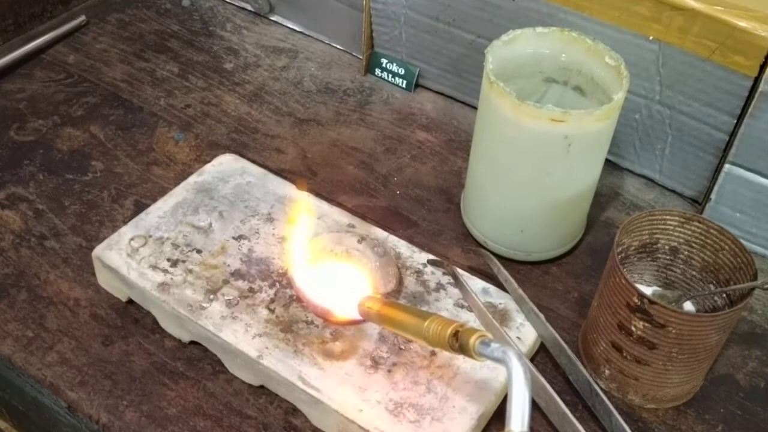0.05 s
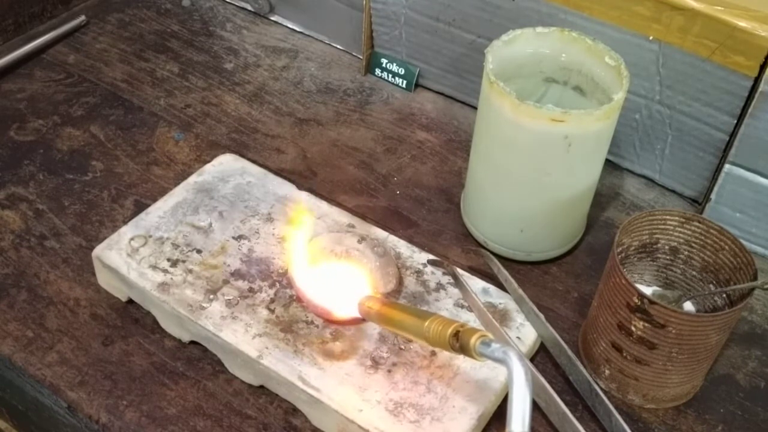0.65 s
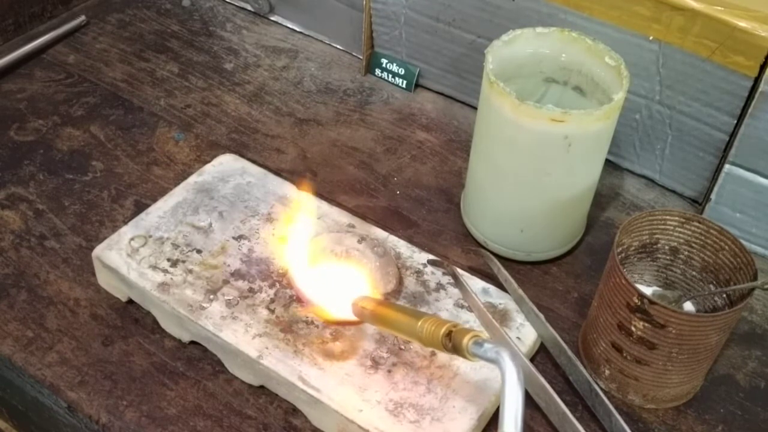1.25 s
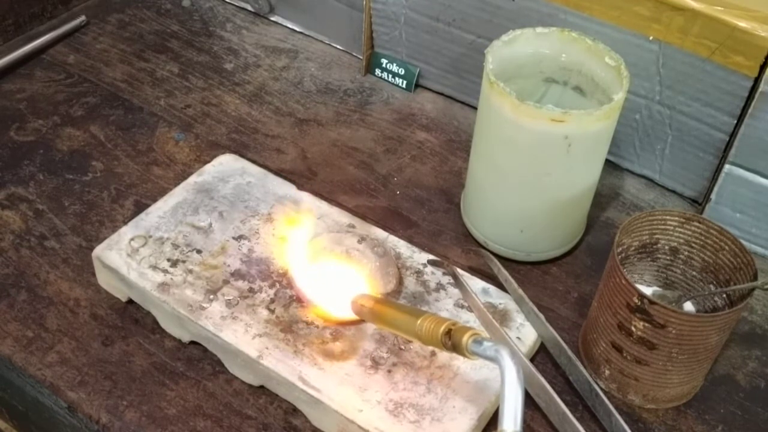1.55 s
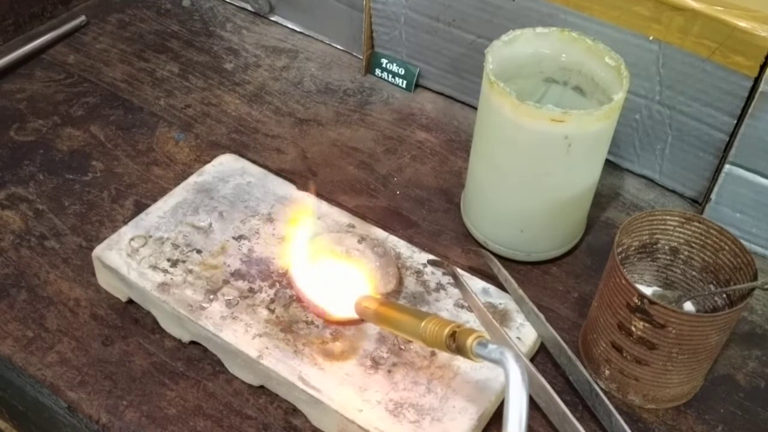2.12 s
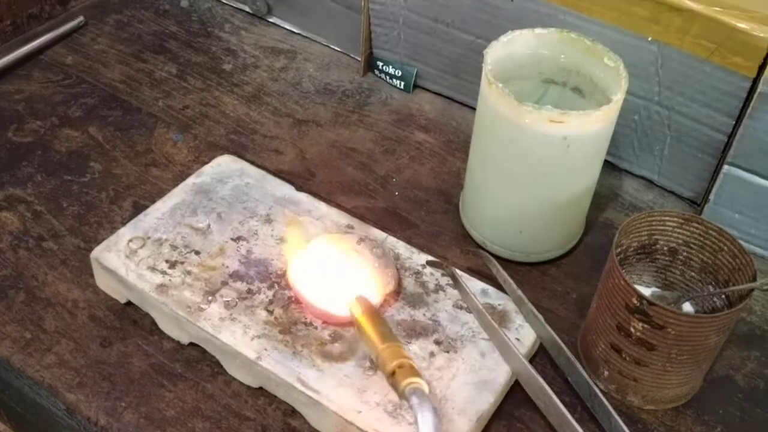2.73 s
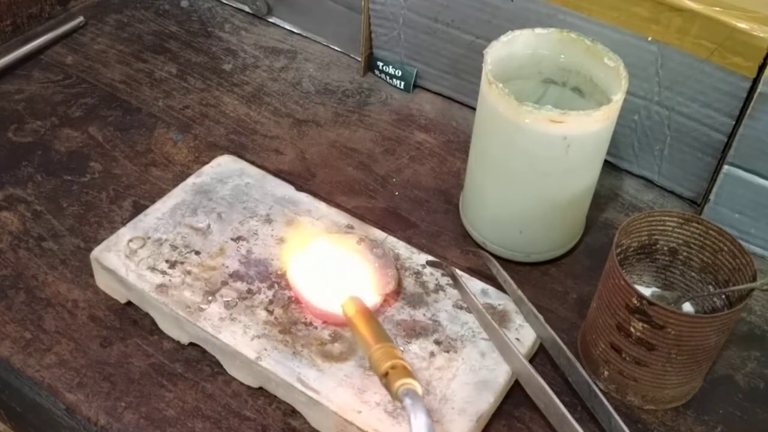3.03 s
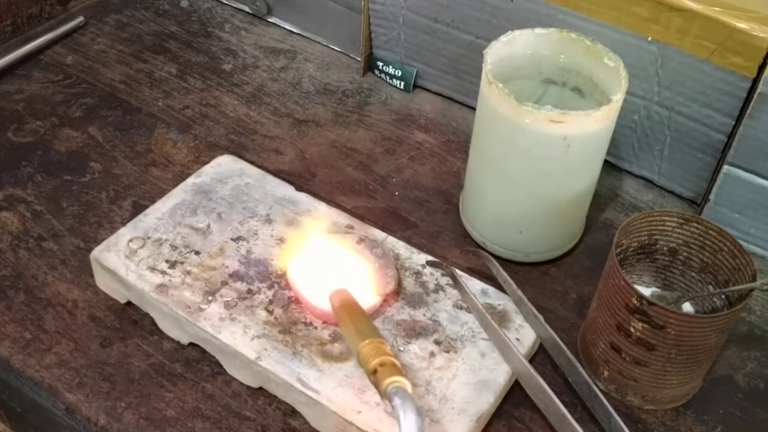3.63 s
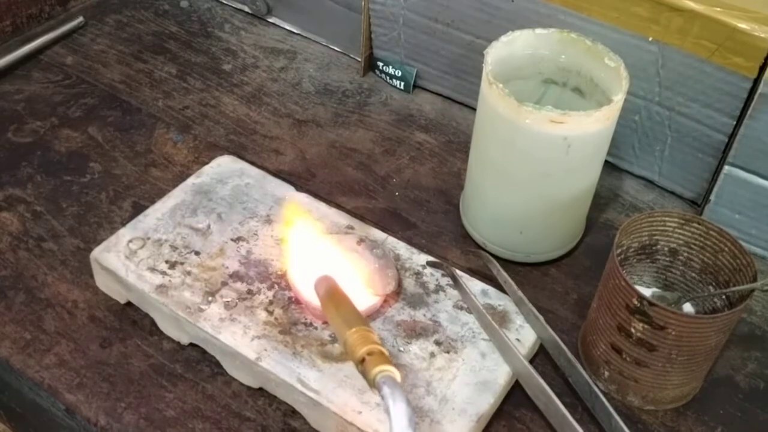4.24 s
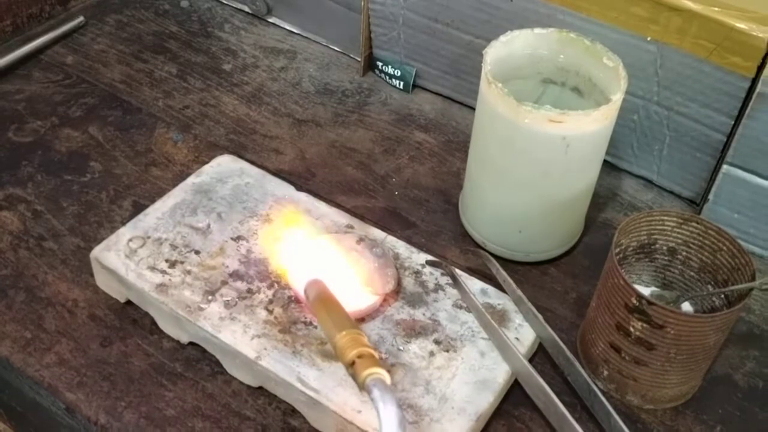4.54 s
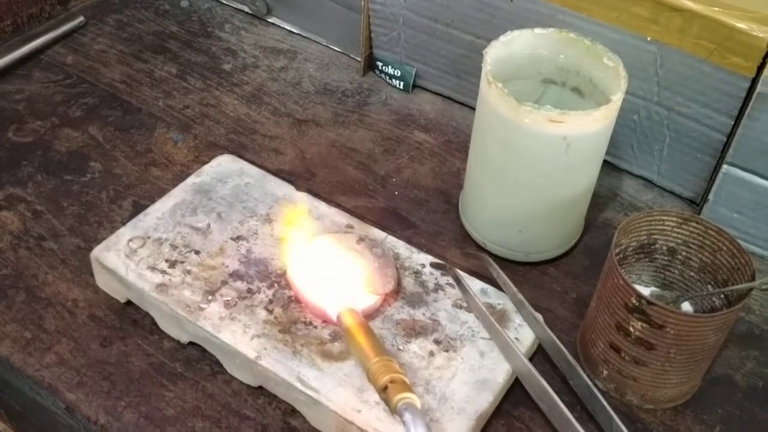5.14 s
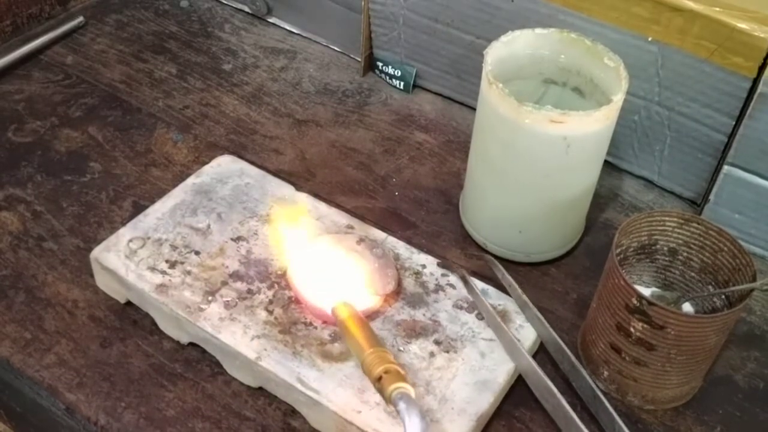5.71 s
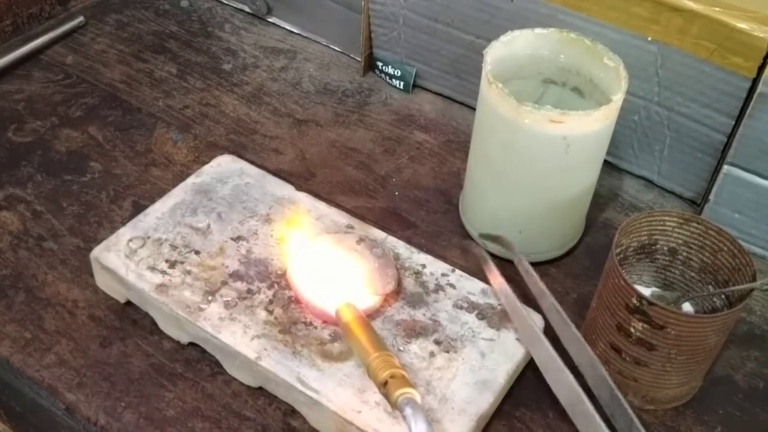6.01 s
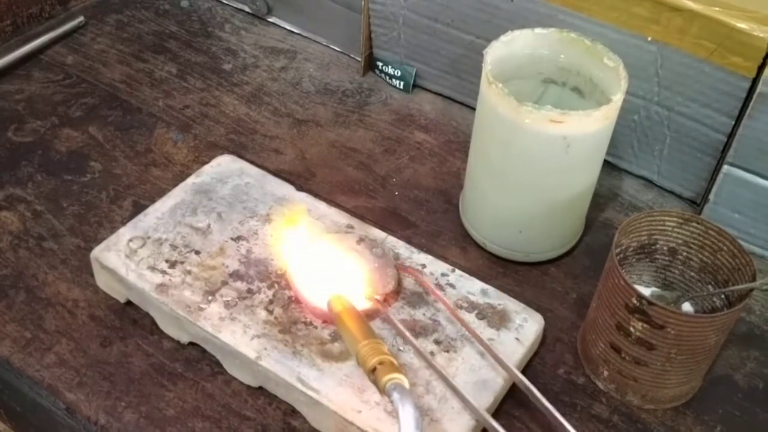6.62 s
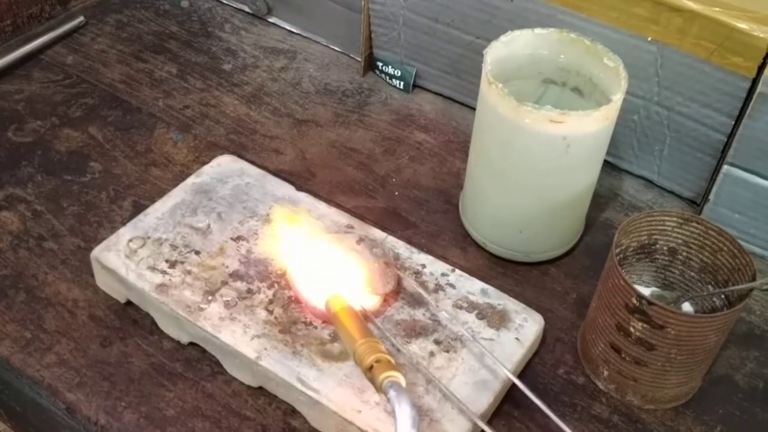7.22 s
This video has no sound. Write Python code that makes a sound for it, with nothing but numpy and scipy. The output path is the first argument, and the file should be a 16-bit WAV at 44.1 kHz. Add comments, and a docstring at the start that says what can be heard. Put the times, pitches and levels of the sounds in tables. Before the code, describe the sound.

A small gas torch burns into a crucible from start to finish, about seven seconds, heard close up on a workshop bench with only slight room reflection. The sound is a rough, steady roar with a softly fluttering bass and a bright gas hiss on top. Around 2.6 seconds the flame flares slightly and the torch swings round, shifting the colour of the hiss. From 3 seconds the nozzle pushes deeper into the bowl: hollow resonances swell and sink a little in pitch, strongest just after 4 seconds. From about 4.5 seconds it draws back, and the resonances ease and rise again while the roar carries on. Faint, very short sputters of catching gas are tucked into the flame at about 1.3, 1.5, 4.1 and 5.1 seconds, twice near 6 seconds, and at 6.8 seconds.

```python
"""A rough, steady roar with a bright hiss on top: a small gas torch plays into a crucible on a
firebrick, close by on a workshop bench. Turbulent eddies make the roar, the loose plume flutters in
the bass, the gas jet hisses at the nozzle, and now and then a pocket of gas catches with a sputter.
The torch is swung round and pushed deeper into the bowl, where most resonances swell and sink in
pitch; then it is drawn back."""
import sys
import numpy as np
from scipy import signal
from scipy.fft import rfft, irfft
from scipy.io import wavfile

SR = 44100
rng = np.random.default_rng(int(sys.argv[2]) if len(sys.argv) > 2 else 0)


def wav_record(signal):
    """Record a signal, one row per channel, as 16-bit PCM in the file named by sys.argv[1]."""
    frames = np.transpose(np.atleast_2d(signal))
    bounded = np.clip(frames, -1, 1)
    # unit amplitude maps onto the largest positive 16-bit level
    quanta = np.round(bounded * 32767).astype(np.int16)
    wavfile.write(sys.argv[1], SR, quanta)


N = 325017
TIME, FREQS = np.arange(N) / SR, np.arange(N // 2 + 1) * SR / N   # s, Hz


def from_db(db):
    """Decibels to gain."""
    return 10 ** (np.asarray(db) / 20)


def at_time(curve, s):
    """The value of an automation curve at the times s."""
    return np.interp(s, *np.transpose(curve))


def over_freqs(rows):
    """The columns of a spectrum table, joined on a log-frequency axis."""
    points, *columns = np.transpose(rows)
    return [np.interp(np.log(FREQS + 1e-9), np.log(points), c) for c in columns]


def bell(x, centre, half_width):
    """A bell curve of height 1, in time or frequency."""
    return np.exp(-np.minimum(((x - centre) / half_width) ** 2, 20))


def drift(corner_hz):
    """A random modulator with spread 1, rolling off above corner_hz."""
    slow = irfft(rfft(rng.standard_normal(N)) / (1 + (FREQS / corner_hz) ** 2), N)
    return slow / slow.std()


def colour(white, spectrum):
    """Shapes unit white noise to a spectrum in dB per Hz."""
    level_db, = over_freqs(spectrum)
    return irfft(rfft(white) * from_db(level_db), N) * np.sqrt(SR / 2)


# colouring by bench and wall: (centre [Hz], half width [Hz], left [dB], right [dB], phase twist [rad])
REFLECTION_EQ = [(107.4, 17, 2.7, 2, 0.04), (130, 8.6, -6.5, -6.9, -0.0), (162, 8.3, 2.5, 2.2, -0.0),
                 (184, 11.6, -5.3, -4, -1), (262.5, 44, 2, 3.5, -0.0), (309, 15, -1.7, -0.5, 0.2),
                 (360.8, 47, 7.5, 7, 0.27), (402, 13.5, -5, -7.1, -0.1), (444, 38, 4.0, -0.7, 0.06),
                 (470.4, 8, -5.0, -5, -0.3), (499, 12, 2.0, 3.5, -0.5), (543.4, 26.6, -8.5, -7, 0.7),
                 (612, 56, 0.3, -4, 0.3), (691, 48.5, -18.5, -11.5, -0.8), (728.7, 33, 9.3, 5.5, 0.65),
                 (970, 18, 3.5, 2.0, -0.3), (1040, 55, -0.2, 4.5, 0.1), (1110, 44.6, -7.0, -13, 3),
                 (1142, 15.4, 2, 3.6, -4.5), (1186, 22, 2, 2.5, -0.5), (1267, 34, -10, 4, -0.8),
                 (1287, 48, 1.4, -4.5, 1.5), (1448, 35, -12, 1.5, -2), (1478, 30, 0.5, -1.0, 2),
                 (1510, 15, -0.5, -5.8, 0.2), (1620, 89, 4.5, 4.5, 0.43), (1685, 48, -9, -4.7, 1),
                 (1820, 68, 0.3, -1, 1.1), (1885, 56, 5.5, -1.5, -1.3), (1950, 113, -3.5, 5.5, 0.46),
                 (2186, 43, 1.2, -4.5, -0.5), (2190, 20, 0, 1, 0.9), (2380, 44, 3, 7, 0.5),
                 (2458, 40, 0.5, 3.5, 2), (2519, 35, 1, -6, -1.2), (2640, 53, -2.5, 1.7, 0),
                 (2808, 29, -1.6, 4.5, 1.5), (2930, 106, 1.1, -0.7, 0.6), (3120, 47, 4.5, 1, 0.1),
                 (3350, 89, 1, 3.5, 0.1), (3984, 281, 2, 6, 0.0), (4320, 134, -1.2, 3, 3),
                 (4920, 380, 4.5, 0, 0.38), (6660, 86, -12, -3.4, 1)]


def reflections(stereo):
    """Bounces off bench and wall put peaks and dips into each side and twist the phase between them."""
    bands = (np.outer(heights, bell(FREQS, centre, width)) for centre, width, *heights in REFLECTION_EQ)
    left_db, right_db, twist = sum(bands)
    pan_db = 0.42
    gain = from_db([left_db - pan_db, right_db + pan_db])
    return irfft(rfft(stereo) * gain * np.exp(0.5j * twist * [[1], [-1]]), N)


# stereo image at the two mic ports: (frequency [Hz], likeness [0-1], phase of left against right [rad])
STEREO_IMAGE = [(100, .99, -.06), (330, .998, -.14), (600, .8, -.7), (760, .97, -.5), (1000, .98, -.44),
                (1350, .85, -2.1), (1750, .6, -.65), (2050, .25, -2), (2340, .82, -2.3), (2750, .3, -2.1),
                (3120, .62, -2.1), (3400, .35, -2.8), (4300, .17, -2.94), (5100, .66, -2.9),
                (6100, .72, -3.4), (7000, .42, -3.5), (7900, .6, -3.2), (9400, .1, -4.4),
                (11400, .26, -5.85), (13500, .28, -7.23)]


def mic_ports(core, fringes, room_t60_s=0.3, room_share=0.3):
    """The right port hears the core first; each port gets its own room tail and fringe of the flame."""
    likeness, phase = over_freqs(STEREO_IMAGE)
    direct = rfft(core) * np.exp(0.5j * phase * [[1], [-1]])
    tail = rng.standard_normal((2, N)) * from_db(-60 * np.minimum(TIME / room_t60_s, 2))
    tail /= np.linalg.norm(tail, axis=1, keepdims=True)
    diffuse = np.sqrt(room_share) * direct * rfft(tail) + np.sqrt(1 - room_share) * rfft(fringes)
    return irfft(np.sqrt(likeness) * direct + np.sqrt(1 - likeness) * diffuse, N)


# the hiss as heard, with a hollow near 8.3 kHz: (frequency [Hz], relative level [dB])
HISS_SPECTRUM = [(2000.0, -103), (5000.0, -87.5), (6100.0, -81), (6700.0, -80), (7600.0, -92.5),
                 (8300.0, -103.7), (9600.0, -84.5), (11000.0, -90), (11850.0, -86), (12600.0, -87),
                 (13800.0, -86), (15500.0, -96)]
# loudness of the hiss, rising as the torch leans in and falling as the bowl muffles it: (time [s], gain [dB])
HISS_LEVEL = [(0.25, -0.4), (1.29, -1), (2.15, -0.5), (2.6, 0.6), (2.81, -2), (3.15, -2.5), (3.55, -0.5),
              (3.7, -2), (4.35, -1), (4.71, -2.5), (4.96, -1.9), (5.89, -1.2), (7.3, -1.6)]


def gas_jet():
    """Gas leaves the nozzle with a bright, slightly flickering hiss; rows: the core and two fringes."""
    flicker_db = 0.33 * drift(corner_hz=22)
    flow = from_db(2.5 + at_time(HISS_LEVEL, TIME) + flicker_db)
    return flow * colour(rng.standard_normal((3, N)), HISS_SPECTRUM)


# the flame's sharpest sputters: (time [s], relative level [dB])
SPUTTER_HITS = [(1.330, -17), (1.493, -16.5), (4.070, -15), (5.075, -13), (5.9025, -10.5), (5.993, -14),
                (6.815, -13)]


def sputters(ring_hz=950, t60_s=0.011, gain_db=2.5):
    """A pocket of gas catches at once and rings in the bowl for a few cycles."""
    kicks = np.zeros(N)
    for s, level_db in SPUTTER_HITS:
        kicks[round(s * SR)] = from_db(level_db + gain_db)
    decay = from_db(-60 / (t60_s * SR))
    angle = 2 * np.pi * ring_hz / SR
    return signal.lfilter([0, np.sin(angle)], [1, -2 * decay * np.cos(angle), decay ** 2], kicks + 1e-18)


# the torch swings round the crucible: (time [s], turn [0-1])
TORCH_TURN = [(2.6, 0), (2.85, 0.86)]
# the nozzle is pushed into the bowl and drawn back: (time [s], depth [0-1])
NOZZLE_DEPTH = [(0.0, 0.1), (2.0, 0.01), (2.7, 0.25), (2.99, 0.36), (3.22, 0.63), (3.57, 0.53), (3.76, 0.7),
                (4.1, 0.99), (4.41, 0.88), (4.6, 0.66), (4.9, 0.38), (6.0, 0.25), (7.3, 0.07)]
# peaks and dips that follow the torch. The 8570 Hz row fills the hollow in the hiss as the torch turns
# and goes deeper; the others are the bowl's: (centre [Hz], half width [Hz], gain at rest [dB],
# added at full depth [dB], added at full turn [dB], pitch bend at full depth [share of centre])
MOVING_EQ = [(656, 35, 2, 8, -4.5, -0.053), (908, 203, 0.48, 6, 1.44, -0.12), (1384, 55, 4, 5, -4, -0.013),
             (2020, 160, 0.2, -11, 1, -0.11), (2300, 91, 2.5, 5, 0, -0.063),
             (2626, 81, 2, -6.5, -0.7, -0.091), (2940, 81, 2, 4.7, -0.5, -0.016),
             (3150, 63, -3.5, -8, 10.5, 0.047), (3545, 400, 5, 6, -5, -0.028),
             (3771, 88, -4, 2, 1.8, -0.027), (4356, 108, 6, -3, 4, -0.08), (4730, 240, 2.6, -6, -2, -0.056),
             (4880, 147, -0.7, 0.5, 1.5, 0.001), (5310, 840, 2.5, 4, 1.3, -0.13),
             (6230, 300, 0.5, 5, 0.2, 0.049), (6700, 370, -3.5, -5.5, 0.3, -0.05),
             (8570, 818, -2.5, 5.5, 6, -0.0081), (9770, 341, -1.6, -1.7, -0.7, -0.018),
             (11722, 740, 6, 0.2, -1.9, -0.058), (13122, 460, 0.5, -4.5, 3.0, 0.024),
             (15116, 672, 3, -5, -0.4, -0.007)]
# brief lifts and dips in single bands of the roar and hiss:
# (peak time [s], half length [s], centre [Hz], half width [Hz], gain [dB])
BAND_SWELLS = [(2.54, .24, 12800, 786, 2.6), (2.62, .16, 1748, 74, -10), (2.64, .07, 2250, 205, 4.5),
               (2.73, 0.2, 4370, 165, 4), (2.89, 0.15, 4170, 99, -8), (3.07, .22, 1575, 38, -3),
               (3.1, .25, 1250, 101, 5.5), (3.15, .13, 13778, 382, 6.6), (3.2, .3, 1980, 65, -7),
               (3.28, 0.5, 11210, 1036, 4), (3.32, .33, 2960, 226, -4.5), (3.348, .34, 839, 94, -3.5),
               (3.36, .19, 14848, 582, 7), (3.36, .4, 3870, 170, 5.5), (3.85, 0.23, 1770, 80, -4),
               (4.0, 0.14, 4050, 170, 2), (4.1, 0.19, 810, 80, 1.5), (4.238, .09, 2750, 133, 8),
               (4.72, .17, 11394, 711, 3), (5.15, 0.39, 400, 110, 2.5)]


def crucible(source):
    """The nozzle closes the bowl's mouth: most resonances grow and go flat; swirling gas wavers them."""
    hz, s, frames = signal.stft(source, SR, nperseg=1024)
    hz = hz[:, None]
    depth, turn = at_time(NOZZLE_DEPTH, s), at_time(TORCH_TURN, s)
    waver = 0.015 * np.interp(s, TIME, drift(corner_hz=14))
    eq_db = 0
    for centre, width, rest_db, deep_db, turned_db, bend in MOVING_EQ:
        height_db = rest_db + deep_db * depth + turned_db * turn
        bent_hz = centre * (1 + (bend + waver) * depth)
        eq_db += height_db * bell(hz, bent_hz, width)
    # on top of that, single bands briefly lift or dip
    for peak_s, half_length, centre, width, db in BAND_SWELLS:
        eq_db += db * bell(s, peak_s, half_length) * bell(hz, centre, width)
    _, coloured = signal.istft(frames * from_db(eq_db), SR, nperseg=1024)
    return coloured[:, :N]


# tone of the combustion: (frequency [Hz], relative level [dB])
ROAR_SPECTRUM = [(40, -78.5), (60, -66), (100, -60), (240, -51), (400, -61.5), (1000, -57.5), (1600, -63.5),
                 (2600, -73.5), (4000, -86), (7000, -100)]
# the flame flares up or sinks back: (peak time [s], half length [s], strike gain [dB], plume gain [dB])
FLAME_SWELLS = [(.23, .17, 1.5, 0), (0.762, 0.11, 1.8, 2.5), (1.35, 0.14, -0.5, -2), (2.393, 0.17, 2, 1.5),
                (2.61, 0.12, 2.5, 0.5), (3.046, 0.36, -1.36, 0), (3.9, 0.14, 0.5, 0.4),
                (4.44, 0.12, -0.6, 1.5), (5.117, 0.07, 1.6, 2.5), (5.945, 0.97, 1, -0.5)]


def flame(crossover_hz=430):
    """Eddies burn in millisecond bursts on top of slower surges; rows: the core and two fringes."""
    eddies_db = 1.12 * drift(corner_hz=304)
    surges_db = 0.5 * drift(corner_hz=25)
    burning = from_db(-0.28 + eddies_db + surges_db)
    roar = colour(burning * rng.standard_normal((3, N)), ROAR_SPECTRUM)
    # the bass comes from the loose plume, the rest from where the flame strikes the bowl
    plume = signal.sosfiltfilt(signal.butter(3, crossover_hz, fs=SR, output="sos"), roar)
    strike = roar - plume
    swells = (np.outer(db, bell(TIME, peak_s, half_length)) for peak_s, half_length, *db in FLAME_SWELLS)
    flare_db, billow_db = sum(swells)
    flutter_db = 0.26 * drift(corner_hz=5.8)
    plume_db = -1.06 + billow_db + flutter_db
    # the strike is louder with the nozzle deep in the bowl, and with the torch turned
    strike_db = -0.81 + flare_db + 0.8 * at_time(NOZZLE_DEPTH, TIME) + at_time(TORCH_TURN, TIME)
    return plume * from_db(plume_db) + strike * from_db(strike_db)


def scene():
    """Flame, jet and sputters sound from one spot, which edges to the right with the swing."""
    core, *fringes = crucible(flame() + gas_jet())
    stereo = reflections(mic_ports(core + sputters(), np.array(fringes)))
    turn = at_time(TORCH_TURN, TIME)
    pan_db = 0.05 * (turn - turn.mean())
    return stereo * from_db([-pan_db, pan_db])


def record(dry, low_cut_hz=40, high_cut_hz=15700):
    """The microphone sheds the deep bass; the top is cut steeply."""
    thinned = signal.sosfilt(signal.butter(3, low_cut_hz, "high", fs=SR, output="sos"), dry)
    return signal.sosfilt(signal.ellip(12, 0.1, 80, high_cut_hz, fs=SR, output="sos"), thinned)


dry = scene()
out = record(dry)
wav_record(out)
```